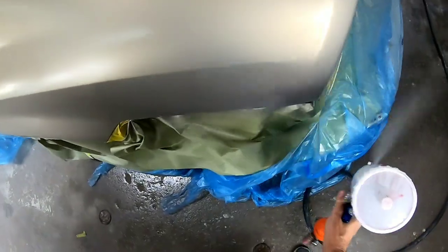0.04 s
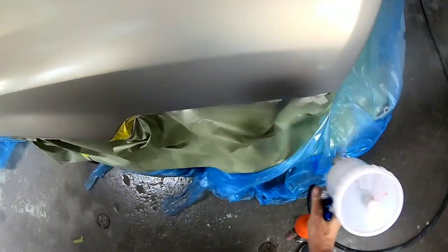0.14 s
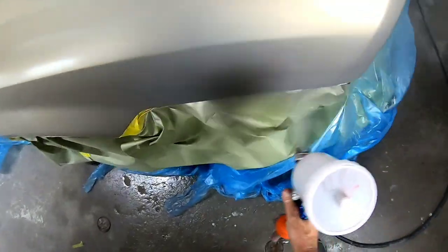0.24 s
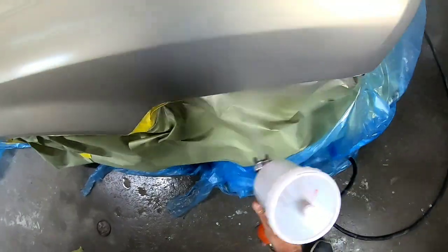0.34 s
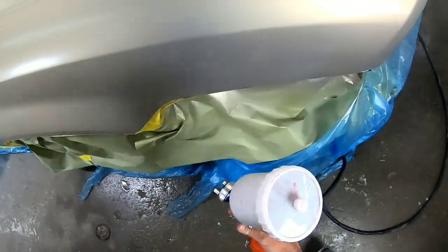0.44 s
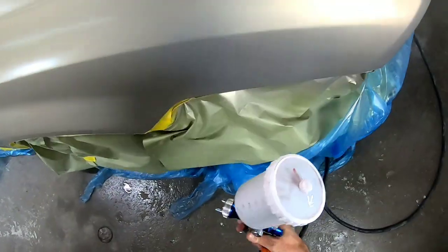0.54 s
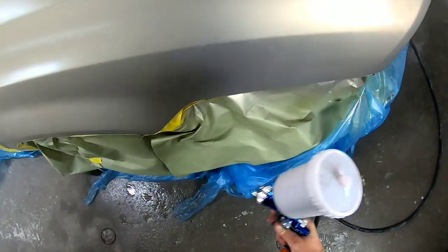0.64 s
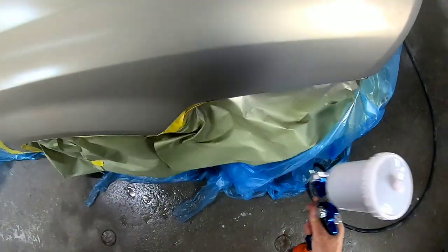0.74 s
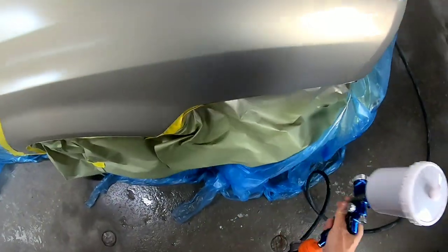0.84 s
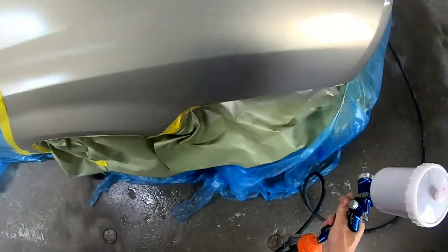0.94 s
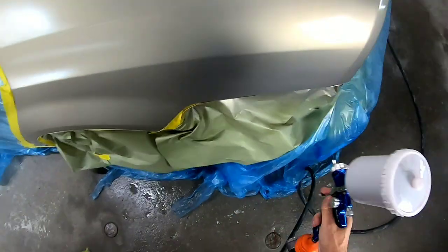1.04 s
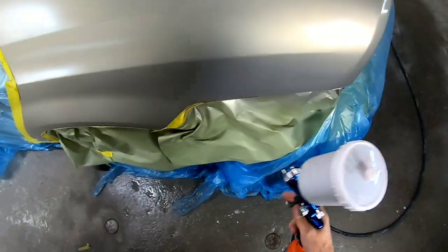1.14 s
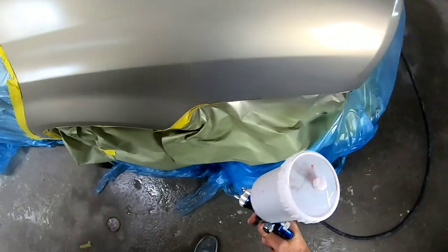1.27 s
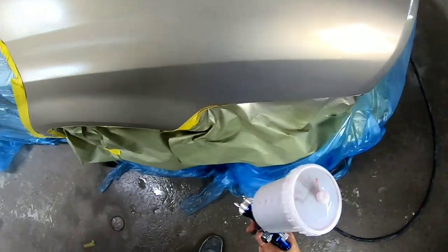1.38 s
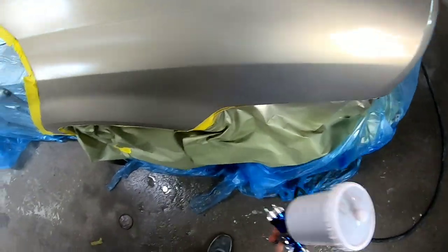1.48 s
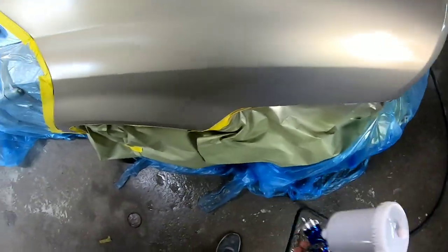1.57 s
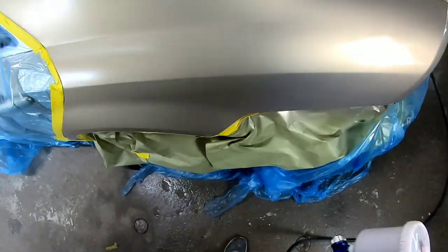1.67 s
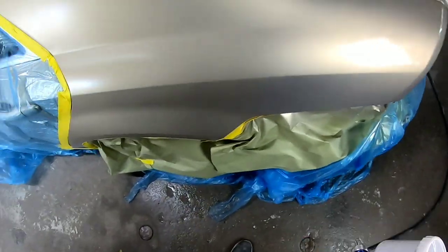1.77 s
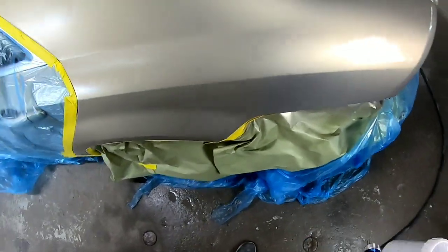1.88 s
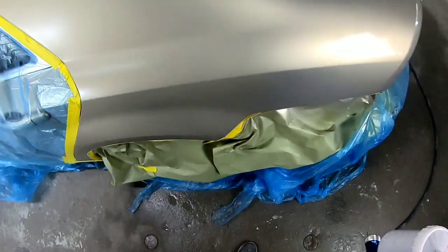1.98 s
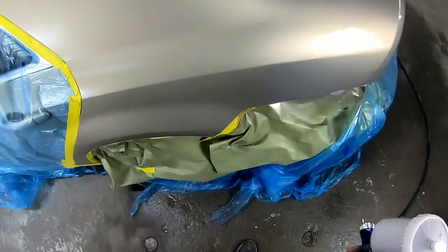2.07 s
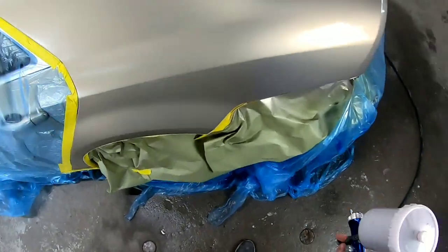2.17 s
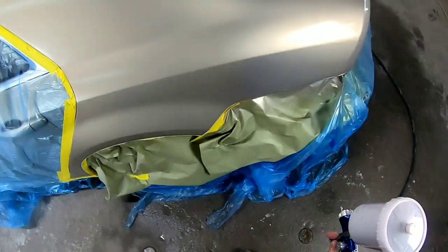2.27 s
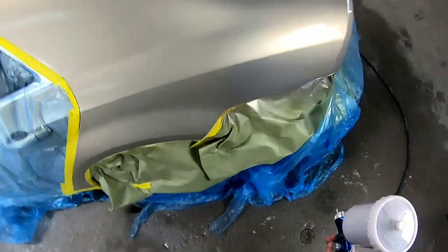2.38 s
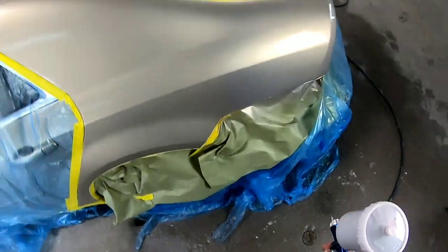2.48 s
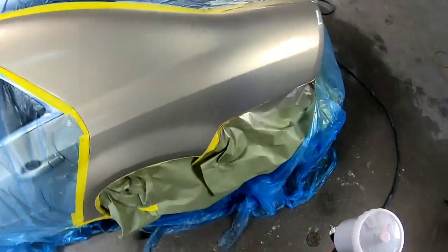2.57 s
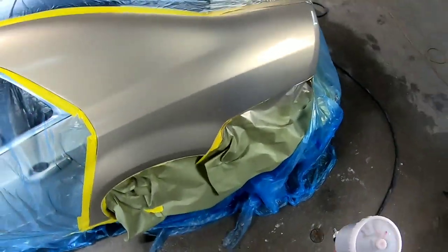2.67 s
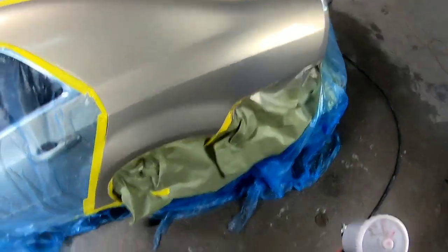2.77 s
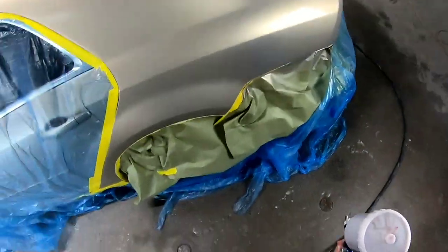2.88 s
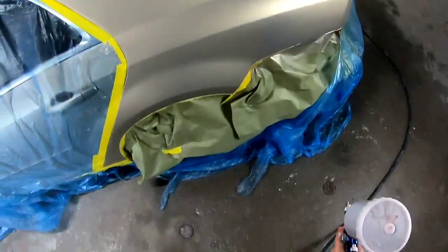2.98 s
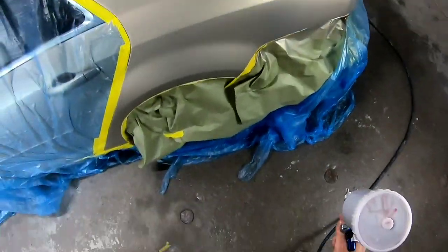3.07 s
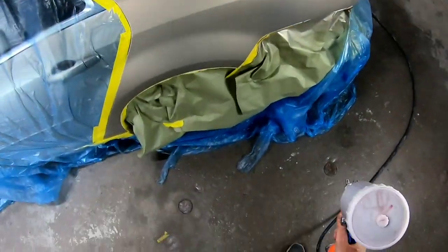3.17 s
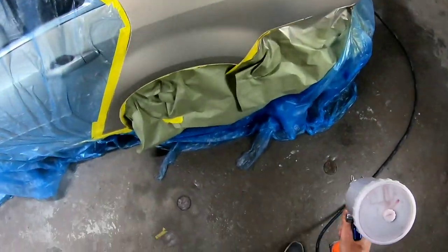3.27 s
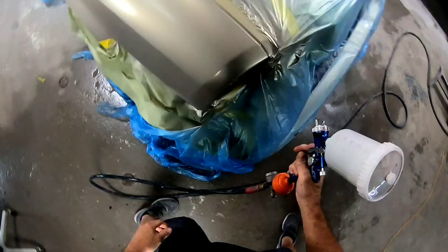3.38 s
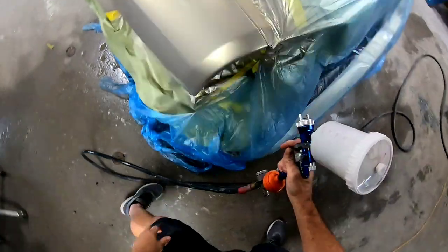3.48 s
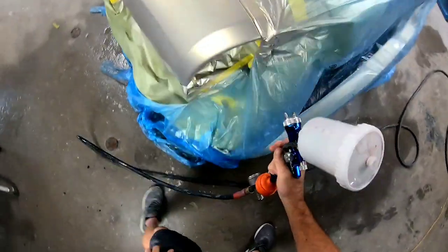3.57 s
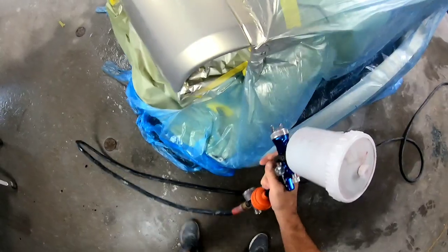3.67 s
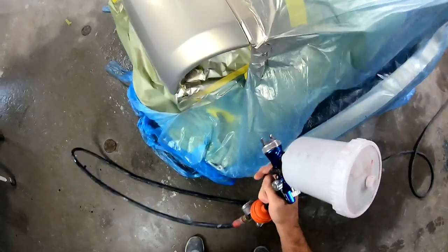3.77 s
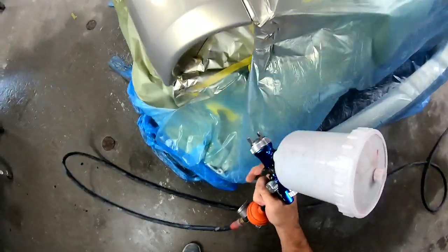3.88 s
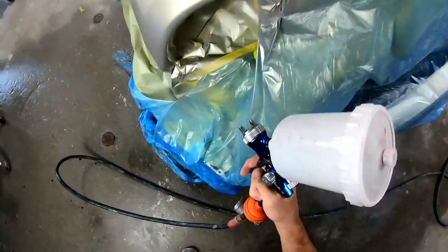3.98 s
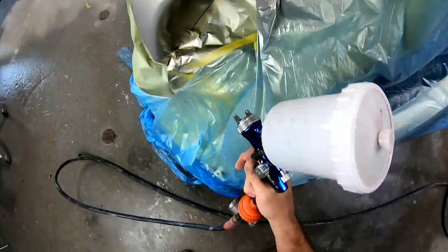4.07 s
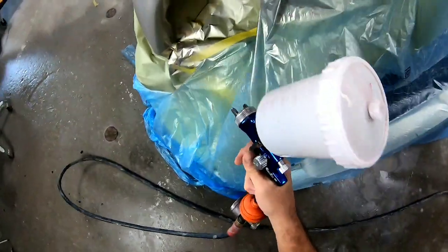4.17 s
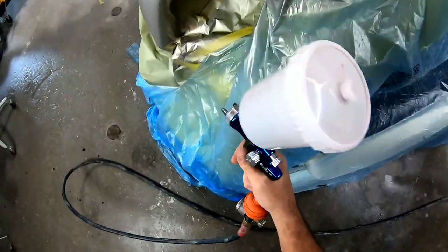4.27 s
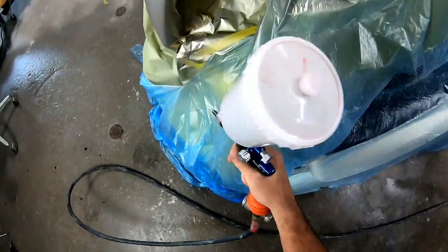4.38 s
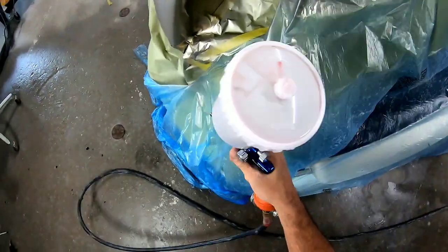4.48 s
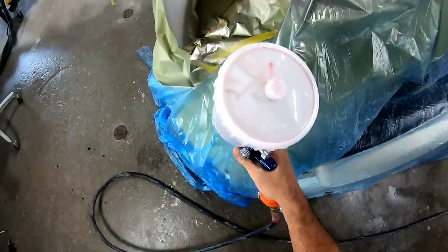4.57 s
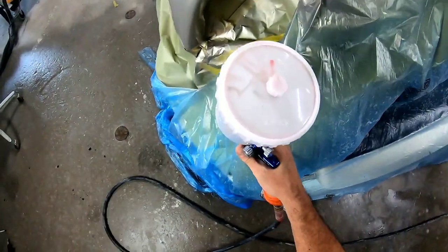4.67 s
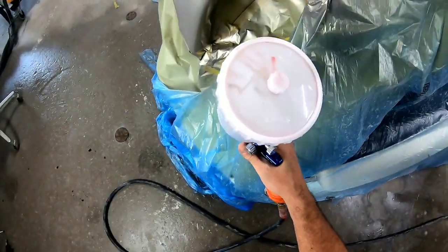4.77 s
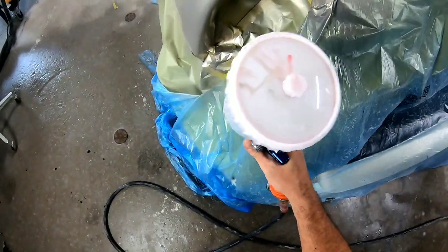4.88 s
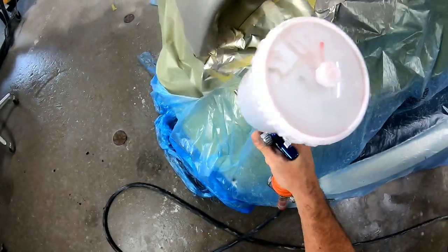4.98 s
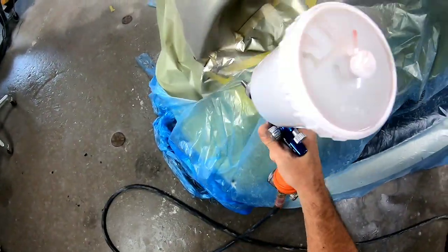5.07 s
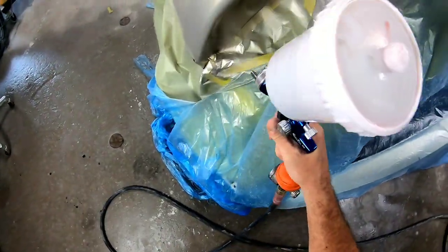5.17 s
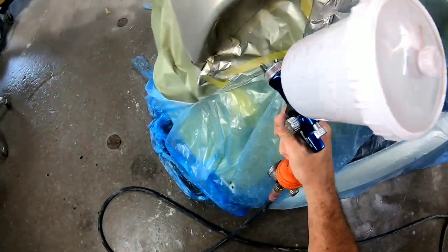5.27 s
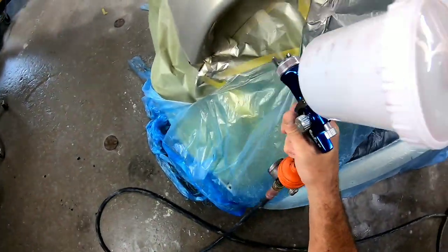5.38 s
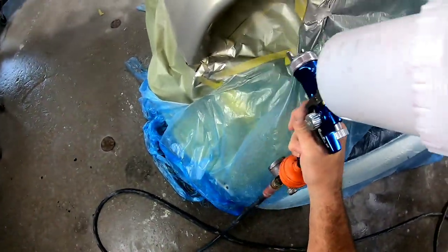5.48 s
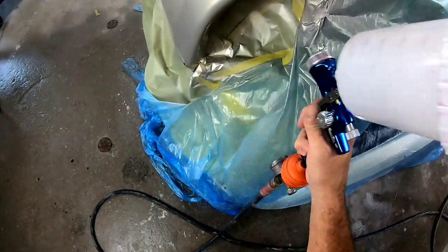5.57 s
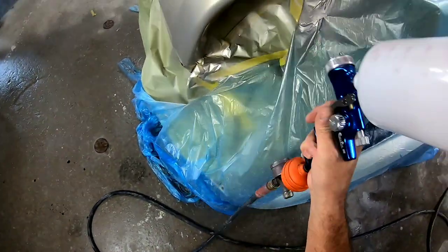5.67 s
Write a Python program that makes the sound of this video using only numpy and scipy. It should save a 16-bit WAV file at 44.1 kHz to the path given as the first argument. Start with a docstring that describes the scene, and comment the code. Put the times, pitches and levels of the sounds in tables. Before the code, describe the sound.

Two close air-gun hisses in a garage, the first louder, separated by a quiet gap of fan rumble, plastic rustles and snaps.

```python
"""In a garage, a paint spray gun hisses close to a two-port action camera: a pass, a seep of air, a pause, a second pass.
The jet is noise whose colour swings and flickers; it roars on the panel and hoots twice across a pocket of masking
paper, noise through broad modes. In the pause plastic film rustles as bursts of noise and ticks as short ringing
modes. An extractor fan is low noise behind it all; the low rumble drops suddenly soon after the second pass starts."""
import sys
import numpy as np
from scipy import signal
from scipy.fft import rfft, irfft
from scipy.io import wavfile
from scipy.ndimage import uniform_filter1d

SR = 44100
rng = np.random.default_rng(int(sys.argv[2]) if len(sys.argv) > 2 else 0)


def log_audio(samples):
    """Write samples as a 16-bit WAV file to the path given in sys.argv[1]."""
    # one column per channel
    frames = np.atleast_2d(samples).T
    # limit to full scale, then quantise
    limited = np.clip(frames, -1, 1)
    pcm = np.round(limited * 32767).astype(np.int16)
    wavfile.write(sys.argv[1], SR, pcm)


N = 253134  # samples
HZ = np.arange(N // 2 + 1) * SR / N + 1e-9  # spectrum bins, kept above zero for the log axis

# Levels are nominal: set before the random drift, the colour swings and the ports.
# The trigger held, pass by pass. Each row: start in seconds, hiss level in dB, then swings in dB of
# the roar on the panel, the nozzle fizz, the bright middle and the body of the hiss.
PASS_1 = [(0, -28.5, -4, .13, .1, -.6), (.22, -29, -2.5, .7, .1, -0.085), (.38, -27.5, 2, 2, .1, 1.2),
          (.62, -28.5, -2.5, .92, .1, -0.46), (.85, -27.5, -3, 2.6, .1, .3),
          (1.105, -28, -5, 0.75, .1, 0.84)]
PASS_2 = [(3.52, -44.5, -6, 1.5, 1, -.6), (3.57, -36, -4, 1.5, 2.5, .3), (3.63, -35, -4, 2.5, 2, 1),
          (3.75, -36, -1.5, 3, 1.5, .1), (3.95, -34, -4.5, -0.2, 1, 1.4), (4.15, -35.5, -4, 1.2, 0, .6),
          (4.4, -35.5, -3, 0.7, 1.5, -0.43), (4.62, -38, 0, 3.5, 1.8, -0.41), (4.85, -36, -2.2, -0.5, 1, 1),
          (5.05, -35.5, 2.1, -0.8, 0.5, 0.44), (5.3, -35, 3, 1.5, 2.5, -0.042),
          (5.5, -34.5, 3.5, 0.5, 4, 0.33), (5.74, -37, 3.5, 1.5, 4.5, 0.26)]
# The last air seeping out after the first pass, mostly duller. Each row: as for the passes.
SEEP = [(1.13, -37, -1.2, -3, .1, -7), (1.2, -37.5, -4.5, -4.5, .1, -9), (1.28, -41, -1.5, -0.3, -.6, -5.5),
        (1.5, -43, -3.5, -2.5, -.6, -3.5), (1.62, -46.5, -5, -2, -.6, -7), (1.7, -48.5, 3, -4, -.6, -6),
        (1.8, -54, 2, .1, -.1, 0)]
# Where each swing acts. Each row: frequency in Hz, then shares 0-1 of roar, fizz, bright middle and body.
SWING_BANDS = [(800, .6, 0, 0, 0), (1900, 1, 0, 0, 0), (2500, .4, 0, 0, .4), (3300, 0, 0, 0, 1),
               (4300, 0, 0, .4, .4), (5500, 0, 0, 1, 0), (7000, 0, 0, 0, 0), (8500, 0, 1, 0, 0)]
# Spits in the seep. Each row: start in seconds, hold in seconds, level in dB.
SPITS = [(1.53, .015, -45.5), (1.58, .015, -41.5), (1.785, .012, -51)]
OPEN_DB_S, CLOSE_DB_S = 520, 186
SPIT_RISE_DB_S, SPIT_FALL_DB_S = 296, 250
# Colour of the jet, gun low at the side, then in front. Each row: frequency in Hz, density in dB per Hz.
JET_1 = [(250, -22.5), (1000, -11.5), (1800, -6), (2500, -2), (3800, -0.5), (5000, -2.5), (6500, -3),
         (9000, -4.5), (12000, -6.5)]
JET_2 = [(250, -19), (1000, -11), (1700, -6.5), (2200, -0.5), (3500, 0.5), (5000, -1), (6500, -1),
         (9000, 0), (12000, -0.5)]
# Where the gun stands in each pass, the room all around, and the paper pocket.
# Each row: frequency in Hz, likeness of the ports 0-1, lead of the left port in radians.
PLACE_1 = [(300, .9, 0), (1700, .45, 0), (3000, .92, 0), (4600, .75, .15), (6200, .3, 1.5), (8000, .3, 1.5),
           (9300, .1, 1), (11300, .4, 1), (13000, .1, 1)]
PLACE_2 = [(300, .9, 0), (1250, .3, -.4), (1900, .6, -.5), (2600, .92, -.1), (4400, .95, 0),
           (6000, .6, 1.4), (7500, .4, 2.2), (8500, .1, 2.2), (10000, .2, 1.2), (11500, .55, 1.7),
           (13000, .15, 1.7)]
AROUND = [(30, .85, 0), (70, .985, 0), (200, .995, 0), (500, .88, .1), (900, .55, .3), (4000, .72, .2),
          (5800, .15, 0), (13000, .15, 0)]
POCKET_PLACE = [(300, .85, 0), (2000, .8, 0)]
# Balance of the two passes and of everything central. Each row: frequency in Hz, left minus right in dB.
PAN_1 = [(300, 7), (1700, 1), (4600, 0), (6200, 3.5), (8000, 0), (13000, 3.5)]
PAN_2 = [(300, 6.6), (1250, 6.4), (2600, 0.5), (4400, 1.4), (7500, 5.4), (9300, 3.1), (13000, 3.1)]
CENTRE = [(300, -.5), (13000, -.5)]

# Narrow band of hiss lingering in the seep. Each row: time in seconds, level in dB.
WHEEZE = [(1.2, -54), (1.4, -63), (1.55, -58), (1.7, -57), (1.8, -60)]
WHEEZE_HZ, WHEEZE_WIDTH_HZ = 2600, 460  # width before the response is squared

# Hoots. Each row: start in seconds, hold in seconds, level in dB.
HOOTS = [(.25, 0.17, -40), (.5, 0.032, -39)]
HOOT_RISE_DB_S, HOOT_FALL_DB_S = 250, 220
# Modes of the paper pocket. Each row: frequency in Hz, width in Hz before squaring, strength in dB.
POCKET_MODES = [(806, 32, 3), (570, 160, -16), (725, 150, -10), (880, 120, -10), (1030, 170, -11),
                (1540, 100, -12)]

# Separate rustles. Each row: start in seconds, hold in seconds, level in dB, centre in Hz, width in octaves.
RUSTLES = [(1.874, .006, -55, 5600, .35), (1.878, .045, -58, 2400, .25), (2.405, .008, -57, 4000, .8),
           (2.455, .015, -59, 3500, .8), (2.675, .04, -58.5, 4200, .8), (2.81, .055, -59.5, 2500, .6),
           (3.052, .02, -58, 2800, .7), (3.168, .05, -57.5, 3800, .65), (3.4, .03, -62, 4000, .5)]
RUSTLE_RISE_DB_S, RUSTLE_FALL_DB_S = 600, 150
# Faint hiss under the rustles. Each row: start in seconds, hold in seconds, level in dB.
FILM_HISS = [(1.87, 0.94, -57.5), (3.03, 0.61, -58.5)]
# Colour of that hiss. Each row: frequency in Hz, density in dB per Hz.
FILM_COLOUR = [(1200, 15), (2200, 0.5), (4500, -6), (7000, -6.5), (9000, -9), (12000, -27)]

# Snaps of plastic. Each row: start in seconds, peak of the straight ring in dB, share of the walls in dB,
# strength of the repeats in dB, thin below in Hz, dull above in Hz.
TICKS = [(1.8670, -29.5, -33, -4, 4300, 7000), (2.3875, -19.5, -32, 0, 400, 16000),
         (3.057, -44, -25, 0, 1500, 8000)]
# Modes of the stiff plastic. Each row: frequency in Hz, strength in dB, 60 dB decay time in seconds.
TICK_MODES = [(1100, -7, .005), (1750, -2, .004), (2800, -3, .004), (3900, -3, .0035), (4900, -6, .0045),
              (5800, -5, .0045), (7200, -9, .003), (8600, -14, .0025), (11000, -16, .002),
              (13500, -16, .002)]
# A snap straight, then off the panel and, thinner, off the floor.
# Each row: delay in seconds, level in dB, thin below in Hz.
TICK_REPEATS = [(0, 0, 100), (.001, -6, 100), (.0017, -12, 100), (.0037, -4, 2600)]
TICK_RISE_S, GARAGE_T60_S, GARAGE_GAP_S = .0002, .36, .018

# Faint hollow tone, held steady before the second pass, then fading.
# Each row: start in seconds, hold in seconds, level in dB.
HOLLOW = [(3.05, 0.43, -57.5)]
HOLLOW_HZ, HOLLOW_WIDTH_HZ = 1005, 110  # width before the response is squared
HOLLOW_RISE_DB_S, HOLLOW_FALL_DB_S = 170, 30

# The low background, full and then thin after its sudden drop.
# Each row: time in seconds, then levels in dB of the rumble, the airflow and the deep throb.
FULL = [(0, -46, -52.5, -64), (.3, -46.5, -49, -50.5), (.55, -44, -47.5, -47), (.85, -45, -50.5, -51),
        (1.1, -47, -51.5, -63), (1.5, -43, -48.5, -48), (2.1, -43, -49.5, -52.5), (2.5, -43, -51, -40.5),
        (2.75, -41, -49.5, -51), (3.05, -40.5, -50, -46), (3.65, -44, -49.5, -57)]
THIN = [(3.65, -67, -58, -63), (4.25, -61, -62, -72), (4.75, -57.5, -62.5, -74), (5.05, -53.5, -55, -66),
        (5.3, -53.5, -54.5, -63), (5.55, -46.5, -54.5, -69), (5.74, -51, -56, -72)]
# One more welling of the rumble after the drop. Each row: start in seconds, hold in seconds, level in dB.
SURGE = [(3.93, .04, -51.5)]
SURGE_RISE_DB_S, SURGE_FALL_DB_S = 120, 90
# Colours of the full and thin rumble, the throb and the airflow. Each row: frequency in Hz, density in dB per Hz.
RUMBLE = [(45, -26), (70, 4), (100, 0.5), (160, -2), (236, -5.5), (280, -18.5), (400, -45.5)]
THIN_RUMBLE = [(45, -31), (70, 1.5), (110, 1.5), (190, -2), (280, -4.5), (450, -14.5), (800, -23.5)]
DEEP = [(15, -32), (28, -17), (45, 14), (62, 0), (85, -53), (200, -69)]
AIRFLOW = [(220, -4.5), (300, 0.5), (500, -5), (870, -4), (1300, -9.5), (2000, -13), (3500, -18)]
BLADE_HZ, THIN_BLADE_HZ, BLADE_WIDTH_HZ = 242, 207, 7.0
BLADE_DB = -11.0  # against the rumble
GUST_DB, DEEP_GUST_DB = 1., 1.
SWITCH_DB_S = 3000  # crossing from full to thin

# Microphone ports, each a small cavity. Each row: frequency in Hz, gain in dB.
LEFT_PORT = [(7500, .5), (7900, -1.5), (8300, -3.5), (8700, 1), (9200, 4.5), (9550, .5), (10000, 0),
             (12300, 1), (12800, -4), (13300, -8), (13800, -12.5), (14200, -14), (14600, -21), (15000, -35)]
RIGHT_PORT = [(300, .5), (1000, 3), (4400, 2), (4800, 6), (5400, 10), (6100, 9.5), (7000, 6.5), (7900, 5.5),
              (8400, 3.5), (8850, 5), (9300, 9.5), (9550, 8), (9900, 2.5), (11700, 2), (12300, .5),
              (13300, -5), (13800, -12.5), (14200, -14), (14600, -21), (15000, -35)]
# Port peaks drifting as the camera turns against the gun.
# Each row: time in seconds, middle peak in Hz, upper peak in Hz.
TURN = [(0, 5750, 9300), (.22, 5900, 9300), (.45, 5450, 9350), (.68, 5250, 9200), (.85, 5600, 9150),
        (1, 5900, 9400), (1.3, 6250, 9250), (1.75, 6300, 9250), (1.95, 5500, 9200), (2.7, 5650, 9300),
        (3.2, 5300, 9300), (3.6, 5800, 9450), (3.8, 5950, 9600), (4, 6100, 9450), (4.3, 5800, 9300),
        (4.6, 5500, 9200), (4.9, 5450, 9150), (5.3, 5900, 9250), (5.5, 5600, 9250), (5.74, 5500, 9300)]
PEAKS_AT_REST_HZ = 5700, 9330
# How far each drift reaches. Each row: frequency in Hz, share 0-1 of the middle and of the upper peak's shift.
PEAK_REACH = [(3600, 0, 0), (5000, 1, 0), (6400, 1, 0), (7900, 0, 0),
              (8600, 0, 1), (10200, 0, 1), (11500, 0, 0)]
TOP_HZ = 14950


def spray(curve, gain, colour, place, pan, eddy_db, drift_db):
    """The jet: eddies make patches of the hiss flicker; its colour drifts at random, separately at each port."""
    t, _, *swings_db = np.transpose(curve)

    def tone(hz, s):
        bands = on_hz(SWING_BANDS, hz)
        db = sum(np.outer(band, np.interp(s, t, swing)) for band, swing in zip(bands, swings_db))
        db = db + eddy_db * flicker(db.shape, 12, 20)  # the same at both ports
        return undb([db + drift_db * flicker(db.shape, 50, 6) for _ in range(2)])

    hiss = noise(undb(on_hz(colour)[0]), place, pan)
    return gain * shaped(hiss, tone)


def seep():
    """The last air leaks out in a falling hiss with a few spits, in the colour and place of the first pass."""
    leak = held(SEEP, OPEN_DB_S, CLOSE_DB_S)
    spits = bursts(SPITS, SPIT_RISE_DB_S, SPIT_FALL_DB_S)
    return spray(SEEP, np.hypot(leak, spits), JET_1, PLACE_1, PAN_1, eddy_db=.5, drift_db=1.)


def wheeze():
    """Seeping air in one narrow resonance."""
    band = abs(resonance(WHEEZE_HZ, WHEEZE_WIDTH_HZ)) ** 2
    return held(WHEEZE, 100, 100) * noise(band, PLACE_1)


def hoot():
    """The jet blows across a paper pocket and stirs its broad modes."""
    modes = sum(undb(db) * abs(resonance(hz, width)) ** 2 for hz, width, db in POCKET_MODES)
    tone = noise(modes, POCKET_PLACE, [(300, 1.8), (2000, 3.2)])  # leans left
    return wander(.8, 12) * bursts(HOOTS, HOOT_RISE_DB_S, HOOT_FALL_DB_S) * tone


def film():
    """Thin plastic sheet shifting: a faint hiss and rustles, each with its own colour, broken into short creases."""
    colour = undb(on_hz([(400, -30)] + FILM_COLOUR)[0])
    hiss = bursts(FILM_HISS, RUSTLE_RISE_DB_S, RUSTLE_FALL_DB_S) * noise(colour, AROUND)

    def rustle_gain(hz, s):
        at = np.clip((s * SR).astype(int), 0, N - 1)
        power = 0
        for start, hold, db, centre, octaves in RUSTLES:
            # wider or higher bands are spread thinner, to keep the level
            band = np.exp(-(np.log2(hz / centre) / octaves) ** 2) * SR / (centre * octaves * 2)
            level = bursts([(start, hold, db)], RUSTLE_RISE_DB_S, RUSTLE_FALL_DB_S)[at]
            power = power + np.outer(band, level ** 2)
        return np.sqrt(power)

    rustles = shaped(noise(1, AROUND), rustle_gain)
    return wander(1.5, 5) * (wander(1.8, 50) * hiss + wander(2., 2) * rustles)


def ticks():
    """Stiff plastic snaps and rings briefly, repeated by near surfaces and smeared by the garage walls."""
    t = np.arange(SR // 2) / SR
    decay = 1000. ** (-t / GARAGE_T60_S)
    build = (.3 + .7 * (t > GARAGE_GAP_S)) * (t > .004)  # weak from 4 ms, full after the gap
    walls = rng.standard_normal((2, len(t))) * decay * build

    def ring(thin_hz, dull_hz):
        modes = 0
        for k, (hz, db, t60) in enumerate(TICK_MODES):
            # neighbouring modes start in opposite directions
            mode = (-1) ** k * undb(db) * np.sin(2 * np.pi * hz * t) * 1000. ** (-t / t60)
            modes = modes + mode / (1 + (thin_hz / hz) ** 4 + (hz / dull_hz) ** 4)
        return np.clip(t / TICK_RISE_S, 0, 1) * modes  # a short ramp softens the start of the snap

    out = np.zeros((2, N + SR))
    for s, db, walls_db, repeats_db, thin_hz, dull_hz in TICKS:
        snap = ring(thin_hz, dull_hz)
        gain, i = undb(db) / abs(snap).max(), int(s * SR)
        smear = signal.fftconvolve(walls, snap[None])[:, :len(t)]
        out[:, i:i + len(t)] += gain * undb(walls_db) * smear
        for delay, echo_db, echo_hz in TICK_REPEATS:
            j = i + int(delay * SR)
            echo_gain = gain * undb(echo_db + repeats_db * (delay > 0))
            out[:, j:j + len(t)] += echo_gain * ring(max(thin_hz, echo_hz), dull_hz)
    return out[:, :N]


def hollow():
    """Noise in one resonance, heard as a faint hollow tone."""
    band = abs(resonance(HOLLOW_HZ, HOLLOW_WIDTH_HZ)) ** 2
    return bursts(HOLLOW, HOLLOW_RISE_DB_S, HOLLOW_FALL_DB_S) * noise(band, AROUND)


def fan(curve, colour, blade_hz, surge=0):
    """Low rumble with a wavering blade tone, a deep throb below and the airflow above it, all in gusts."""
    blade = undb(BLADE_DB) * noise(resonance(blade_hz, BLADE_WIDTH_HZ), AROUND)
    rumble = noise(undb(on_hz([(20, -61.5)] + colour)[0]), AROUND) + blade
    deep = noise(undb(on_hz(DEEP)[0]), AROUND)
    airflow = noise(undb(on_hz(AIRFLOW + [(15000, -30)])[0]), AROUND)
    rumble_gain, air_gain, deep_gain = [held(curve, SWITCH_DB_S, SWITCH_DB_S, column=k) for k in (1, 2, 3)]
    upper = wander(GUST_DB, 60) * ((rumble_gain + surge) * rumble + air_gain * airflow)
    return upper + wander(DEEP_GUST_DB, 60) * deep_gain * deep


def undb(db):
    """Decibels to gain."""
    return 10 ** (np.asarray(db) / 20)


def on_hz(table, hz=HZ):
    """Columns of a (Hz, ..) table read at every frequency, straight on a log axis."""
    f, *columns = np.transpose(table)
    return [np.interp(np.log(hz), np.log(f), c) for c in columns]


def resonance(hz, width_hz):
    """Response of one mode, gain 1 at its centre."""
    return 1 / (1 + 1j * (HZ / hz - hz / HZ) * hz / width_hz)


def noise(shape, place, pan=CENTRE):
    """Noise at the two ports: a shared part and an own part, panned and lagged; the mean of both has rms 1."""
    like, lead = on_hz(place)
    shared, own = rfft(rng.standard_normal((2, N))) * shape
    mid, side = np.sqrt(1 + like) * shared, np.sqrt(1 - like) * own
    turn = undb(on_hz(pan)[0] / 2) * np.exp(.5j * lead)
    pair = irfft([(mid + side) * turn, (mid - side) / turn], N)
    return pair / pair.mean(axis=0).std()


def flicker(shape, frames, bands):
    """Random dB over frequency and time, smooth across some bands and frames; spread 1."""
    field = rng.standard_normal(shape)
    for _ in range(2):
        field = uniform_filter1d(field, frames, axis=1)
        field = uniform_filter1d(field, bands, axis=0)
    return field / field.std()


def wander(db, frames):
    """Gain that drifts at random by about db, smoothed over frames of 64 samples."""
    points = N // 64 + 2
    drift = flicker((1, points), frames, 1)[0]
    return undb(db * np.interp(np.arange(N) / 64, np.arange(points), drift))


def held(curve, rise_db_s, fall_db_s, column=1):
    """Gain of a (s, dB) curve that fades in before it and out after it at steady rates."""
    rows, t = np.array(curve), np.arange(N) / SR
    before = np.clip(rows[0, 0] - t, 0, None)
    after = np.clip(t - rows[-1, 0], 0, None)
    return undb(np.interp(t, rows[:, 0], rows[:, column]) - rise_db_s * before - fall_db_s * after)


def bursts(rows, rise_db_s, fall_db_s):
    """Gain of events that rise, hold and die away, summed in power."""
    return np.sqrt(sum(held([(s, db), (s + abs(hold), db)], rise_db_s, fall_db_s) ** 2 for s, hold, db in rows))


def shaped(pair, gain_at):
    """Both channels through a gain over frequency and time, given by gain_at(hz, s)."""
    hz, s, cells = signal.stft(pair, SR, nperseg=512, noverlap=384)
    return signal.istft(cells * gain_at(hz + 1, s), SR, nperseg=512, noverlap=384)[1][:, :N]


def scene():
    """Both passes, the seeping air, hoots, film, ticks, hollow tone and low background."""
    first_gain = held(PASS_1, OPEN_DB_S, CLOSE_DB_S)
    second_gain = held(PASS_2, OPEN_DB_S, CLOSE_DB_S)
    first = spray(PASS_1, first_gain, JET_1, PLACE_1, PAN_1, eddy_db=1.12, drift_db=1.5)
    second = spray(PASS_2, second_gain, JET_2, PLACE_2, PAN_2, eddy_db=0.65, drift_db=0.95)
    surge = bursts(SURGE, SURGE_RISE_DB_S, SURGE_FALL_DB_S)
    background = fan(FULL, RUMBLE, BLADE_HZ) + fan(THIN, THIN_RUMBLE, THIN_BLADE_HZ, surge)
    return first + second + seep() + wheeze() + hoot() + film() + ticks() + hollow() + background


def record(dry):
    """Each port cavity colours the sound its own way, its peaks drifting; a steep low-pass cuts the top."""
    def ports(hz, s):
        t, *peaks_hz = np.transpose(TURN)
        reach = on_hz(PEAK_REACH, hz)
        shift_hz = sum(np.outer(r, np.interp(s, t, peak) - rest)
                       for r, peak, rest in zip(reach, peaks_hz, PEAKS_AT_REST_HZ))
        return undb([on_hz(port, hz[:, None] - shift_hz)[0] for port in (LEFT_PORT, RIGHT_PORT)])

    top_cut = signal.ellip(12, .2, 70, TOP_HZ, fs=SR, output="sos")
    return signal.sosfilt(top_cut, shaped(dry, ports))


dry = scene()
out = record(dry)
log_audio(out)
```